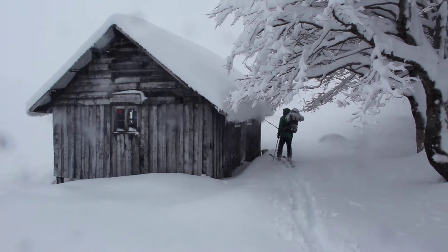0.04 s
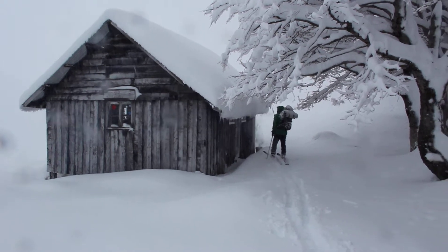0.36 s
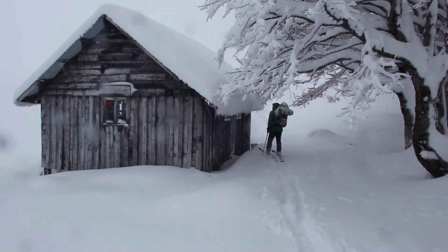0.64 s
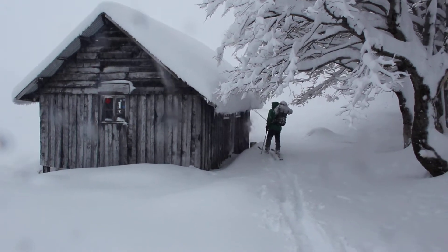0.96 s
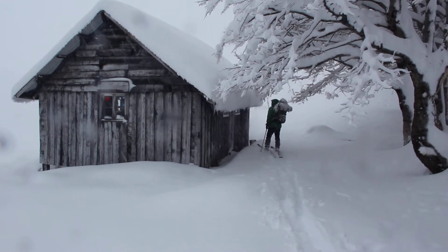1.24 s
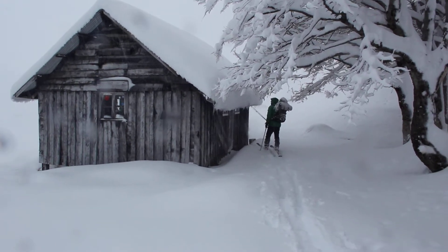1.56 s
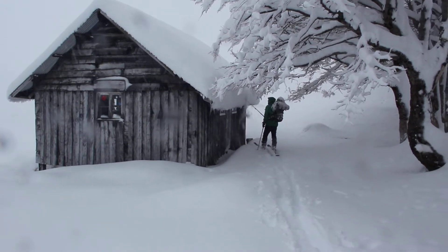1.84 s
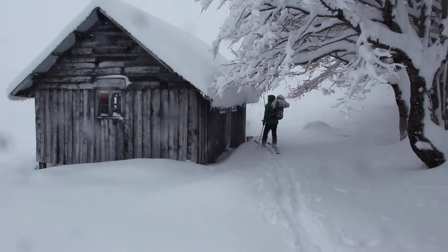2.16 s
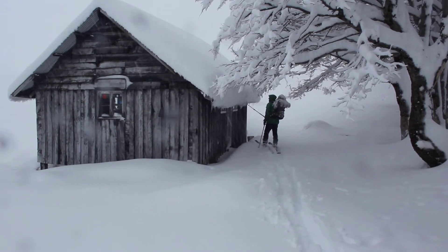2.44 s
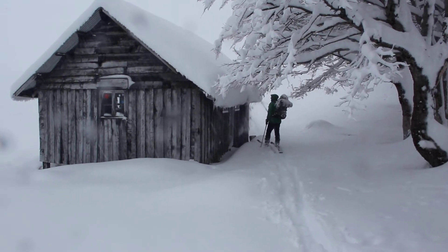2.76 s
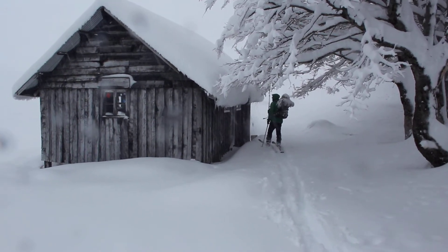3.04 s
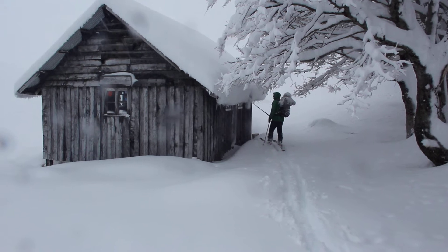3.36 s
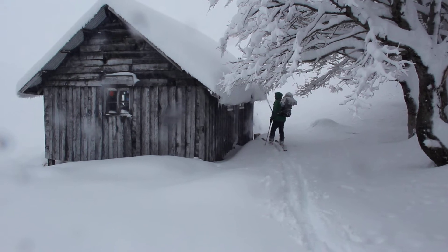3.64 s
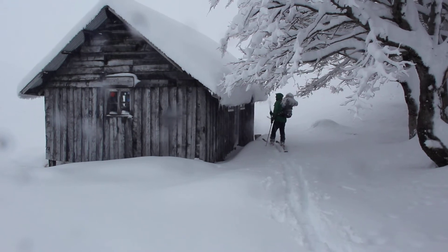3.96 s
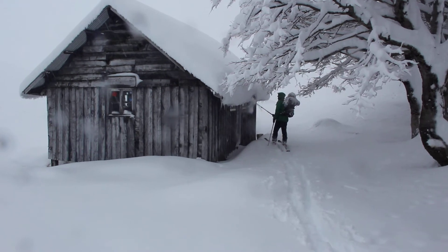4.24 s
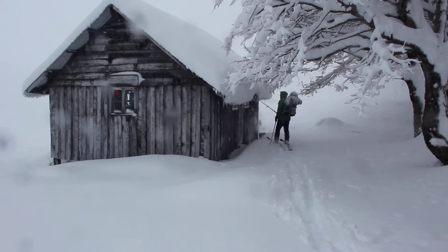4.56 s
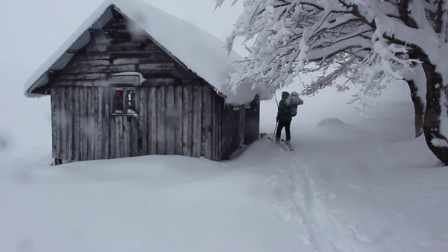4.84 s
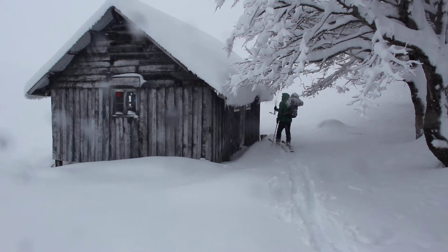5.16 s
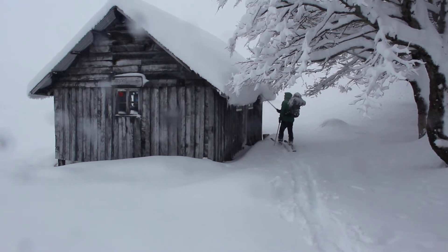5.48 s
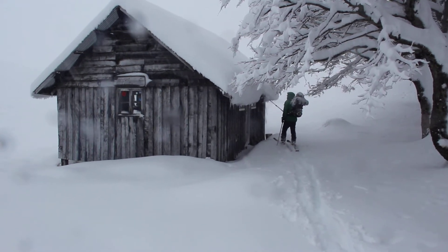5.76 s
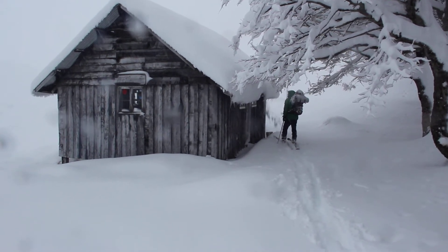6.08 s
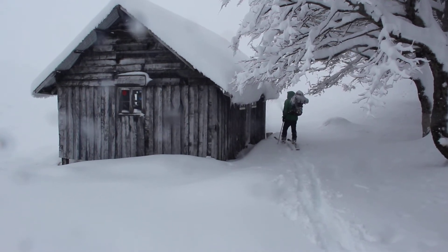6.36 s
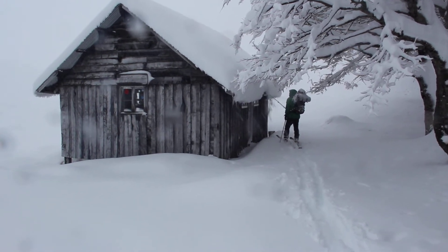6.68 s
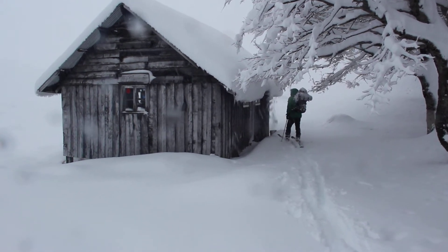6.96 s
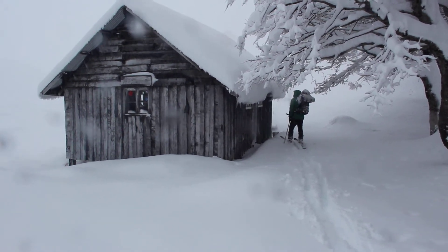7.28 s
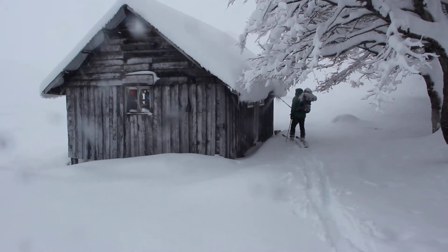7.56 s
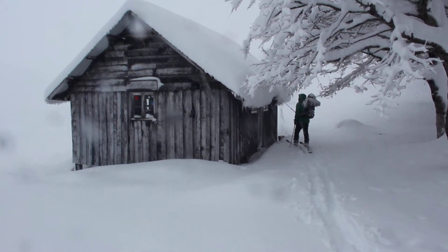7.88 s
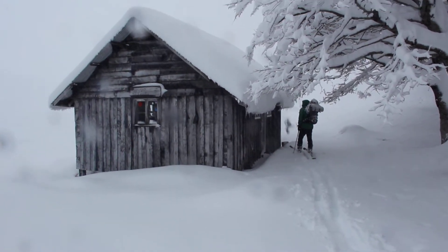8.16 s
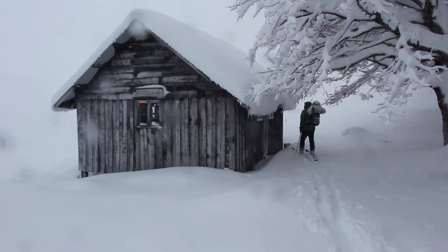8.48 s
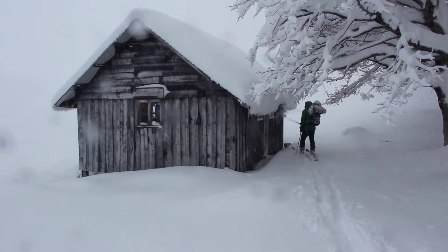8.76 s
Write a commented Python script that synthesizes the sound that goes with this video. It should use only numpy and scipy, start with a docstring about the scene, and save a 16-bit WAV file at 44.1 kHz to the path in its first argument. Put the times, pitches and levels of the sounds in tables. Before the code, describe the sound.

Close, steady ski strides crush deep snow, ease into a quiet shuffle, and give way to light scrapes, knocks and creaks of equipment.

```python
"""A ski edge scuffs and a buckle jingles, close to the microphone, out in deep snow on a still day.
A ski tourer shuffles on: in each stride the weight lands and crushes the snow under a ringing ski,
then the crunch fades and clothing rustles. After a pause and one more stride the gear knocks, clicks
and creaks, and small metal parts jingle. The snow swallows all echoes; a faint hiss of air lies behind."""
import sys
import numpy as np
from scipy import signal
from scipy.fft import rfft, irfft, next_fast_len
from scipy.io import wavfile

SR = 44100
rng = np.random.default_rng(int(sys.argv[2]) if len(sys.argv) > 2 else 0)


def digitize_waveform(pressure):
    """Quantize a signal to 16-bit integers and store it at the path in sys.argv[1].

    Rows of a 2-D input are taken as channels; values are limited to [-1, 1].
    """
    field = np.atleast_2d(pressure).T
    bounded = np.clip(field, -1, 1)
    quanta = np.round(bounded * 32767).astype(np.int16)
    wavfile.write(sys.argv[1], SR, quanta)


N = 397782
TIME = np.arange(N) / SR

# The tone of each noise. Each row: frequency in Hz, relative level in dB.
AIR_SPECTRUM = [(15, -55), (25, -8), (193, 0), (253, 2.5), (495, -2.5), (552, -1.5), (666, -4),
                (1620, -6.5), (1950, -7.5), (2300, -7), (3530, -10.5), (15500, -19)]
HISS_SPECTRUM = [(1500, -38), (3500, 0), (6500, 1.5), (9000, 0), (13000, 0.5), (15500, -4)]
RASP_SPECTRUM = [(100, -8), (300, -6.5), (700, -2), (1500, 1.5), (2600, 1.5), (4000, -2.5), (6000, -9),
                 (9000, -9), (15500, -39)]
RUB_SPECTRUM = [(50, -50), (150, -24), (195, -7), (235, 1), (320, -9), (450, 0), (560, -5), (750, -6),
                (1500, -11), (3000, -28), (8000, -67)]
GRIT_SPECTRUM = [(800, -37), (1600, -15.5), (2700, 2), (4000, -4), (6000, -10), (10000, -15.5),
                 (15500, -21)]
CRUSH_SPECTRUM = [(40, -24), (100, -17), (160, -5), (240, 1), (500, -1.5), (750, -1.5), (1100, -7),
                  (1600, -1.5), (2300, -11), (3500, -18), (7000, -38.5)]
# Resonances of ski and boot. Each row: frequency in Hz, width in Hz, level in dB over the plain sound.
SKI_MODES = [(460, 35, 2.5), (510, 13.5, 7), (613, 56, 4), (692, 17, 6.5), (776, 30, 3), (955, 29, 0.5),
             (1051, 12, 7), (1290, 105, -8), (1710, 61, -11), (2312, 46, 2.5), (3340, 55, -3),
             (3985, 280, -2)]
# Modes of a loose buckle and a smaller metal part.
# Each row: frequency in Hz, relative level in dB, seconds to fade by 60 dB.
BUCKLE_MODES = [(9100, -14, 0.12), (9700, -4, 0.093), (10320, -7, 0.055), (11860, 0, 0.023),
                (13100, 2.5, .07), (14040, -7, 0.05), (14500, -8, .04), (15100, -6, .04)]
SMALL_PART_MODES = [(8920, -10.5, 0.099), (9600, -13, .06), (9350, -24, .05)]
# Touches that set those two ringing. Each row: start in seconds, relative level in dB.
BUCKLE_TOUCHES = [(0.072, -29), (0.105, -28), (0.184, -29), (0.257, -35), (1.127, -31), (2.567, -30),
                  (2.620, -34), (6.469, -24), (6.545, -28), (7.253, -36)]
SMALL_PART_TOUCHES = [(1.835, -33), (2.638, -33), (5.331, -37), (8.075, -43)]
# Pole tips and bindings creak. Each row: start in seconds, decay in seconds, level in dB, pitch in Hz.
GEAR_CREAKS = [(2.888, 0.021, -41.5, 2020), (3.685, 0.025, -40, 2300), (4.535, 0.0022, -35, 3030),
               (4.659, 0.0037, -42, 2730), (6.613, 0.0077, -29.5, 3770), (7.429, 0.013, -28.5, 3400),
               (7.587, 0.0036, -42, 4000), (7.634, 0.0045, -42, 3450), (7.713, 0.011, -35, 1730),
               (7.715, 0.0058, -30.5, 3380), (8.396, 0.015, -38.5, 1650), (8.726, 0.025, -32, 2330),
               (8.805, 0.011, -38, 2450)]
# Boots, bindings and poles knock. Each row: start in seconds, level in dB, pitch in Hz.
GEAR_KNOCKS = [(0.531, -38, 705), (1.641, -22.5, 800), (2.386, -30, 470), (2.646, -20.5, 303),
               (3.253, -28.5, 680), (4.535, -29.5, 1320), (5.317, -31, 150), (5.331, -30.5, 796),
               (6.401, -36, 350), (6.796, -27, 640), (7.253, -22, 1250), (7.72, -29, 590),
               (7.733, -29, 545), (7.763, -21, 595), (7.764, -30, 1510), (7.881, -31, 690),
               (8.396, -29, 937), (8.849, -27, 636), (9.004, -31, 650)]
# The skis glide and shift. Each row: start and length in seconds, murmur and rustle in relative dB.
SKI_GLIDES = [(4.948, 0.19, -56, -78), (5.115, 0.27, -54.5, -72), (5.807, 0.39, -54, -63),
              (6.69, 0.35, -47.5, -57), (7.037, 0.12, -52.5, -75), (7.458, 0.67, -57, -52.5),
              (7.813, 0.18, -50, -67), (8.05, 0.41, -58.5, -75), (8.767, 0.2, -57, -48.5)]
# Hard scrapes of edges, poles and bindings, and softer swishes through powder.
# Each row: start and decay in seconds, rasp and hiss in relative dB.
HARD_SCUFFS = [(0.105, 0.0024, -42, -35), (0.53, 0.004, -39, -62), (1.127, 0.0046, -39, -52),
               (1.191, 0.0062, -41.5, -40), (1.812, 0.0068, -43, -54), (2.076, 0.0066, -40.5, -50),
               (4.536, 0.0022, -30.5, -39.5), (4.704, 0.025, -48, -42.5), (4.92, 0.0034, -45, -47),
               (5.328, 0.011, -43.5, -50), (5.803, 0.011, -47.5, -58), (6.58, 0.0055, -38, -42),
               (6.611, 0.0079, -30, -44), (6.745, 0.032, -45, -63), (7.2038, 0.0038, -39.5, -45),
               (7.2524, 0.0047, -35.5, -36.5), (7.426, 0.024, -35, -45), (7.457, 0.012, -32, -36),
               (7.712, 0.0092, -38, -43), (7.764, 0.0027, -31, -47), (8.726, 0.022, -34.5, -43),
               (8.846, 0.0046, -37.5, -39), (8.986, 0.016, -45.5, -56)]
POWDER_SWISHES = [(0.036, 0.01, -43, -42), (0.793, 0.0088, -30, -35), (2.155, 0.018, -52.5, -63),
                  (2.935, 0.02, -46.5, -48), (2.981, 0.011, -47.5, -45.5), (3.411, 0.011, -35.5, -45),
                  (3.543, 0.017, -41, -67), (3.814, 0.015, -45.5, -44), (4.147, 0.014, -38, -44),
                  (4.224, 0.009, -45, -53), (4.26, 0.011, -38.5, -43), (4.782, 0.021, -51.5, -55),
                  (5.835, 0.043, -55.5, -50.5), (6.497, 0.018, -30.5, -39), (6.991, 0.014, -41.5, -55),
                  (7.866, 0.014, -39, -46), (8.345, 0.056, -48.5, -54)]
# The snow gives way once more under the ski.
# Each row: start in seconds, crunch in relative dB, fade in dB per second, grit offset in dB.
SNOW_SLUMPS = [(0.96, -34.5, 170, -9), (1.646, -27.5, 400, -4.5), (1.875, -41.5, 173, -12),
               (2.5, -33, 400, -5), (2.639, -37, 67, -7), (3.434, -37.5, 350, -11), (4.263, -39, 222, -6),
               (6.616, -30, 189, -22), (7.876, -43, 118, -23)]
# The strides. Each row: start, wait until the weight lands and length of the push, all in seconds,
# crunch in relative dB, fade in dB per second, grit offset in dB, edge hiss in dB, low cut in Hz.
SKI_STRIDES = [(0.0, 0.0, 0.005, -38, 87, -9, -38, 120), (0.7357, 0.0043, 0.24, -29, 77, -4.5, -36.5, 170),
               (1.61, 0.021, 0.18, -31, 117, -10.5, -42, 335), (2.43, 0.032, 0.1, -33, 159, -7, -44, 260),
               (3.267, 0.024, 0.021, -31, 48, -7, -47, 167),
               (4.104, 0.05, 0.0084, -29.5, 51.5, -10.5, -40, 150),
               (6.463, 0.029, 0.072, -28, 252, -4, -30.5, 380)]


def from_db(db):
    """Decibels to gain."""
    return 10 ** (np.asarray(db) / 20)


def rms_one(x):
    """Scale to an rms of 1."""
    return x / np.sqrt(np.mean(x ** 2) + 1e-20)


def coloured(x, spectrum):
    """Give a steady sound a spectrum; rms 1."""
    hz, db = np.transpose(spectrum)
    size = next_fast_len(N)
    bins = np.maximum(np.fft.rfftfreq(size, 1 / SR), 1)
    gain = from_db(np.interp(np.log(bins), np.log(hz), db))
    return rms_one(irfft(rfft(x, size) * gain, size)[:N])


def noise(spectrum):
    """Steady noise with a spectrum; rms 1."""
    return coloured(rng.standard_normal(N), spectrum)


def drift(rate):
    """A random wander that turns about rate times a second; rms 1."""
    turns = rng.standard_normal(N // 20)
    return rms_one(np.interp(TIME * rate, np.arange(len(turns)), turns))


def grains(per_s, spread_db, clump_db, clump_rate):
    """Tiny clicks, as of snow crystals breaking: at random, in many sizes and in clumps."""
    born = rng.random(N) < per_s / SR
    sizes = from_db(spread_db * np.minimum(rng.exponential(1, N), 4)) * rng.choice([-1, 1], N)
    return born * sizes * from_db(clump_db * drift(clump_rate))


def through_ski(x):
    """The ski adds its resonances to whatever shakes it; rms 1."""
    out = x.copy()
    for hz, width, db in SKI_MODES:
        r = np.exp(-np.pi * width / SR)
        feedback = [1, -2 * r * np.cos(2 * np.pi * hz / SR), r * r]
        out += from_db(db) * signal.lfilter(np.array([1, 0, -1]) * (1 - r * r) / 2, feedback, x)
    return rms_one(out)


def add(track, start, sound):
    """Mix a short sound into a track, start seconds in."""
    i = round(start * SR)
    track[i:i + len(sound)] += sound[:N - i]


def air(level_db=-54):
    """The open air over the snow is a faint, steady hiss."""
    return from_db(level_db) * noise(AIR_SPECTRUM)


def clothing(level_db=-63.5, delay_s=0.51, width_s=0.24):
    """Sleeves and pack rustle unevenly as the arms swing through, late in each stride."""
    swing = sum(np.exp(-((TIME - start - delay_s) / width_s) ** 2) for start, *_ in SKI_STRIDES)
    fabric = coloured(grains(per_s=3700, spread_db=7.5, clump_db=-1.5, clump_rate=30), HISS_SPECTRUM)
    return from_db(level_db) * swing * fabric


def crumbs(level_db=-56, tick_s=0.0033):
    """Stray crumbs of snow tick faintly on cloth and skis."""
    ticks = grains(per_s=25, spread_db=2.0, clump_db=2.0, clump_rate=3)
    patter = signal.lfilter([1], [1, -np.exp(-1 / (tick_s * SR))], np.abs(ticks) + 1e-18)
    return from_db(level_db) * patter * (noise(HISS_SPECTRUM) + noise(RASP_SPECTRUM)) / 2


def scratches(gain_db=-15, decay_s=0.003):
    """Metal slides a little on metal at every touch of the buckle."""
    contact, t = np.zeros(N), TIME[:SR // 8]
    for start, db in BUCKLE_TOUCHES:
        add(contact, start, from_db(db + gain_db) * np.exp(-t / decay_s))
    return contact * noise(HISS_SPECTRUM)


def metal(touches, modes, gain_db, detune):
    """Each touch strikes every mode with its own strength; the changing grip shifts the pitches a bit."""
    out, t = np.zeros(N), TIME[:SR // 4]
    hz, mode_db, t60 = np.transpose(modes)[:, :, None]
    for start, db in touches:
        strength, shift = rng.uniform(-1, 1, (2, len(modes), 1))
        fade = (1 + strength / 2) * from_db(mode_db - 60 * t / t60)
        tones = np.sin(2 * np.pi * hz * (1 + detune * shift) * t)
        add(out, start, from_db(db + gain_db) * np.sum(fade * tones, axis=0))
    return out


def creaks(log_half_width=0.2, rise_s=0.0015):
    """A quick run of slips excites one broad resonance, a new one at each contact."""
    out, t = np.zeros(N), TIME[:SR // 8]
    for start, decay, db, hz in GEAR_CREAKS:
        band_hz = hz * np.exp([-log_half_width, log_half_width])
        resonance = signal.butter(2, band_hz, "band", fs=SR, output="sos")
        slips = signal.sosfilt(resonance, rng.standard_normal(len(t)))
        shape = np.minimum(t / rise_s, 1) * np.exp(-np.maximum(t - rise_s, 0) / decay)
        add(out, start, from_db(db) * rms_one(slips * shape) * np.sqrt(np.mean(shape ** 2)))
    return out


def knocks(t60_s=0.028, overtone_ratio=2.3, overtone_db=-13, rattle_db=-18, rattle_t60_s=0.12):
    """Hard plastic knocks, quickly damped by the snow, and shakes the ski for a moment."""
    out, shake, t = np.zeros(N), np.zeros(N), TIME[:SR // 4]
    fade = from_db(-60 * t / t60_s)
    for start, db, hz in GEAR_KNOCKS:
        phase = 2 * np.pi * hz * t
        contact = 1 - np.exp(-hz * t / 0.57)   # a cushioned blow builds over about half a cycle
        overtone = from_db(overtone_db) * fade ** 2 * np.sin(overtone_ratio * phase)
        add(out, start, from_db(db) * contact * (fade * np.sin(phase) + overtone))
        add(shake, start, from_db(db - 60 * t / rattle_t60_s))
    return out + from_db(rattle_db) * shake * through_ski(noise(CRUSH_SPECTRUM))


def glides(murmur_gain_db=1.5, rustle_gain_db=-2.5, rise_s=0.025, fall_s=0.038, sag_db_per_s=9):
    """A lightly loaded ski rubs over the powder with a low murmur, while crumbs of snow rustle."""
    murmur, rustle = np.zeros(N), np.zeros(N)
    for start, length, murmur_db, rustle_db in SKI_GLIDES:
        t = np.maximum(TIME - start, 0)
        gate = np.minimum(t / rise_s, 1) * np.exp(-np.clip((t - length) / fall_s, 0, 20))
        moving = gate * from_db(-sag_db_per_s * t)   # a glide slows as it goes
        murmur = np.hypot(murmur, from_db(murmur_db + murmur_gain_db) * moving)
        rustle = np.hypot(rustle, from_db(rustle_db + rustle_gain_db) * moving)
    rub = coloured(grains(per_s=2500, spread_db=0.5, clump_db=-1.5, clump_rate=31), RUB_SPECTRUM)
    loose_snow = coloured(grains(per_s=2500, spread_db=6.0, clump_db=1.0, clump_rate=140), GRIT_SPECTRUM)
    return murmur * rub + rustle * loose_snow


def squeaks(per_s=1100, t60_cycles=14, low_hz=1400, high_hz=9000, pitches=18):
    """Bigger clumps of cold snow squeak for a few cycles as they shear, each at its own pitch."""
    out = np.zeros(N)
    for hz in np.geomspace(low_hz, high_hz, pitches):
        clicks = np.zeros(N)
        at = rng.integers(0, N, int(per_s * N / SR / pitches))
        clicks[at] = rng.standard_normal(len(at))
        r, w = from_db(-60 * hz / (t60_cycles * SR)), 2 * np.pi * hz / SR
        ringing = signal.lfilter([np.sin(w), 0, -np.sin(w)], [1, -2 * r * np.cos(w), r * r], clicks + 1e-18)
        out += ringing / w ** 1.5   # higher squeaks are weaker
    return rms_one(out)


def scrape_shape(t, decay, rise, lead_db=-13, tail_db=-19, tail_s=0.086):
    """The snow starts to give, the scrape swells and stops, and loosened crumbs trickle after it."""
    lead = from_db(lead_db) * np.exp(np.minimum(t, 0) / (0.16 * decay))
    swell = np.maximum(np.clip(t / rise, 0, 1), lead)
    after = np.maximum(t - rise, 0)
    stop = np.exp(-(after / decay) ** 0.83)
    trickle = from_db(tail_db) * np.exp(-after / tail_s)
    return swell * np.maximum(stop, trickle)


def scuffs(shear, edge_db=-37.5, edge_decay_s=0.024, hard_rise_share=0.15, soft_rise_share=0.73):
    """Edges and poles scrape with a rasp and a hiss: sharply as each stride opens, softly in powder."""
    rasp, hiss = np.zeros(N), np.zeros(N)
    openings = [(start, edge_decay_s, edge_db, hiss_db) for start, *_, hiss_db, _ in SKI_STRIDES]
    scrapes = [(*row, hard_rise_share) for row in openings + HARD_SCUFFS]
    scrapes += [(*row, soft_rise_share) for row in POWDER_SWISHES]
    for start, decay, rasp_db, hiss_db, rise_share in scrapes:
        near = np.abs(TIME - start) < 0.25
        shape = scrape_shape(TIME[near] - start, decay, rise_share * decay)
        rasp[near] += from_db(rasp_db) * shape
        hiss[near] += from_db(hiss_db) * shape
    catching = rms_one(from_db(drift(rate=300)))   # the surfaces catch and slip
    scraped = coloured(grains(per_s=9000, spread_db=3.0, clump_db=1.0, clump_rate=180), RASP_SPECTRUM)
    coarse = from_db(1.5) * through_ski(scraped) + from_db(-9.5) * shear
    return catching * (rasp * coarse + hiss * noise(HISS_SPECTRUM))


def thuds(gain_db=-19.5, hz=97, t60_s=0.11, deep_cut_hz=170):
    """The landing weight shakes the deep snow; a ski that stays near the surface hardly does."""
    out, t = np.zeros(N), TIME[:SR // 4]
    for start, lag, _, db, *_, low_hz in SKI_STRIDES:
        depth = min(deep_cut_hz / low_hz, 1) ** 3   # the deeper a ski sinks, the lower its crunch reaches
        fade = from_db(db + gain_db - 60 * t / t60_s)
        add(out, start + lag, depth * fade * np.sin(2 * np.pi * hz * t))
    return out


def pressure(t, hold, fade_db_per_s, landing_s=0.0028, sag_db_per_s=21.5):
    """The weight on the snow comes on quickly, sags during the push, then fades."""
    loss_db = sag_db_per_s * np.minimum(t, hold) + fade_db_per_s * np.maximum(t - hold, 0)
    return np.minimum(t / landing_s, 1) * from_db(-np.minimum(loss_db, 200))


def crunch(shear, crush_db=-0.88, crystal_db=-3, squeak_db=-6, grit_loss_db_per_s=12, slump_cut_hz=276):
    """Weight packs the snow: a dull crunch from below the ski, finer grit and squeaks along its edges."""
    collapse = from_db(1.76 * drift(rate=70))   # the snow gives way in small jerks
    coarse = grains(per_s=3000, spread_db=2.0, clump_db=0.43, clump_rate=200)
    fine = grains(per_s=9000, spread_db=1.0, clump_db=2.5, clump_rate=300)
    crush = through_ski(coloured(coarse, CRUSH_SPECTRUM))
    crystals = through_ski(coloured(fine, GRIT_SPECTRUM))
    flicker = from_db(1.95 * drift(rate=38))
    edges = (from_db(crystal_db) * crystals + from_db(squeak_db) * shear) * flicker
    pushes = [(start + lag, hold, db, fade, grit_db, low_hz)
              for start, lag, hold, db, fade, grit_db, _, low_hz in SKI_STRIDES]
    pushes += [(start, 0, db, fade, grit_db, slump_cut_hz) for start, db, fade, grit_db in SNOW_SLUMPS]
    out = np.zeros(N)
    for start, hold, db, fade, grit_db, low_hz in pushes:
        t = np.maximum(TIME - start, 0)
        packed = signal.sosfilt(signal.butter(2, low_hz, "high", fs=SR, output="sos"), crush)
        grit = from_db(grit_db - grit_loss_db_per_s * t) * edges   # dies sooner as the ski slows
        out += from_db(db) * pressure(t, hold, fade) * (from_db(crush_db) * packed + grit)
    return collapse * out


def scene():
    """One microphone close to the skier: still air behind, gear and snow in front, no echo."""
    background = air()
    jingles = metal(BUCKLE_TOUCHES, BUCKLE_MODES, gain_db=-16, detune=0.022)
    pings = metal(SMALL_PART_TOUCHES, SMALL_PART_MODES, gain_db=-6, detune=0.003)
    shear = squeaks()
    snow = crunch(shear) + thuds() + scuffs(shear) + glides() + creaks() + crumbs()
    gear = knocks() + jingles + scratches() + pings + clothing()
    return (background + gear + snow)[None]


def record(dry, cutoff_hz=16000):
    """The very top of the treble is cut steeply."""
    return signal.sosfilt(signal.ellip(12, 0.1, 80, cutoff_hz, fs=SR, output="sos"), dry)


dry = scene()
out = record(dry)
digitize_waveform(out)
```